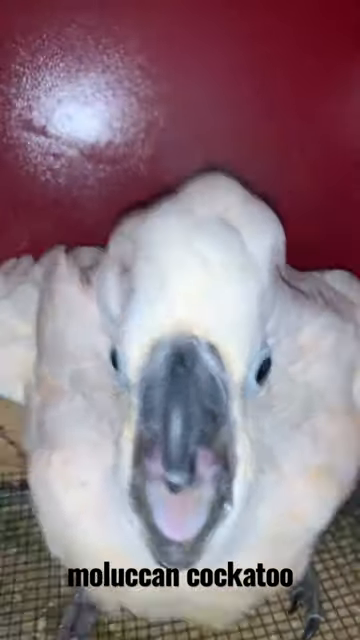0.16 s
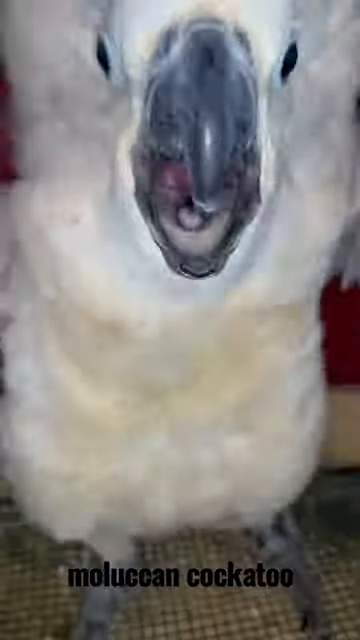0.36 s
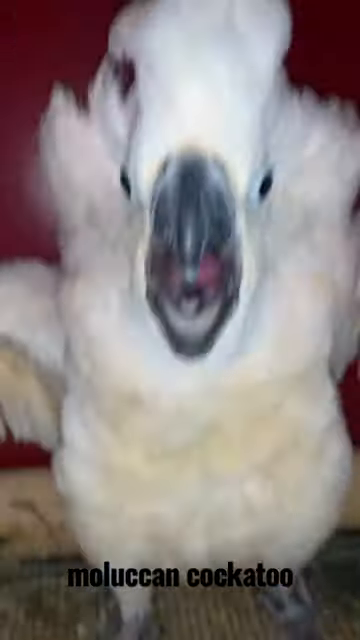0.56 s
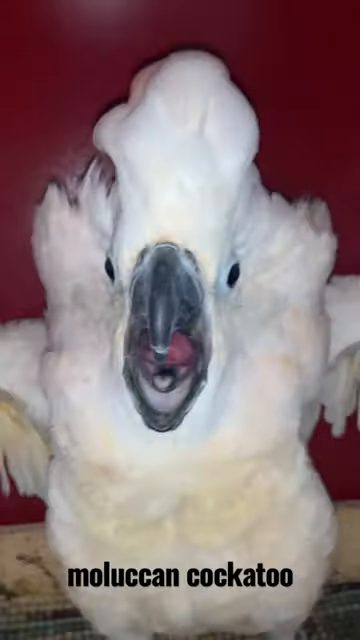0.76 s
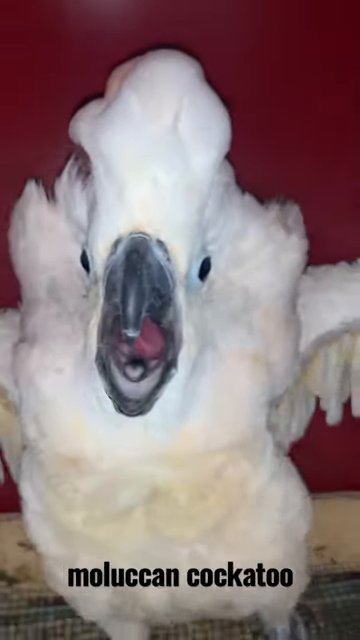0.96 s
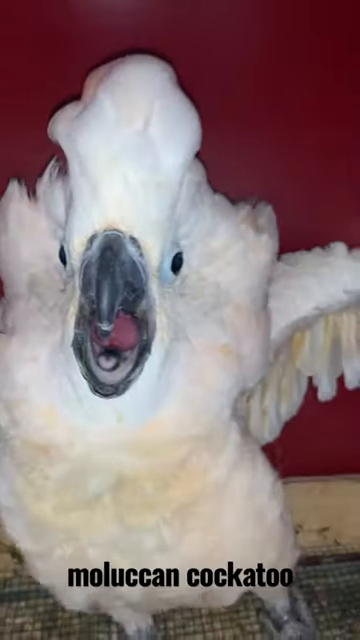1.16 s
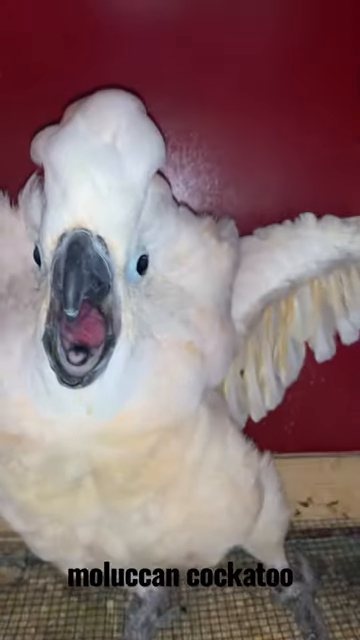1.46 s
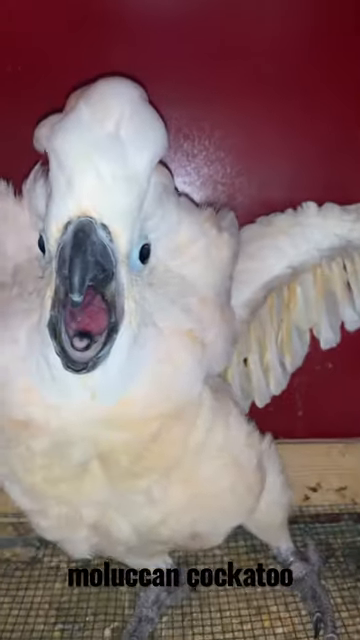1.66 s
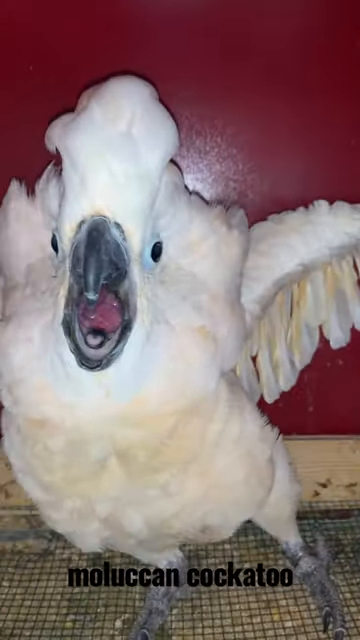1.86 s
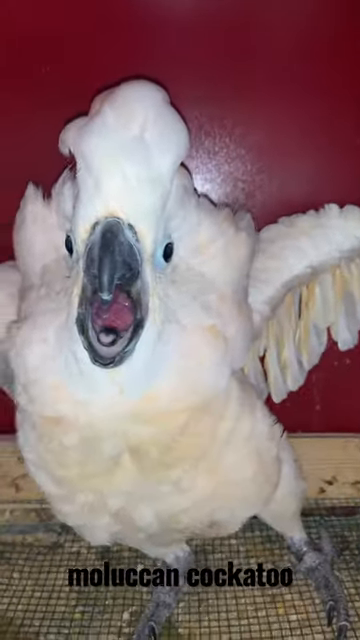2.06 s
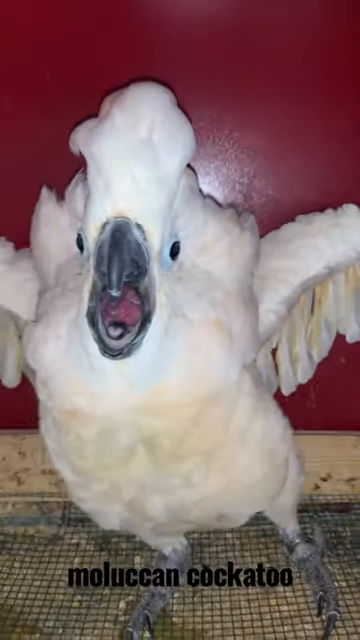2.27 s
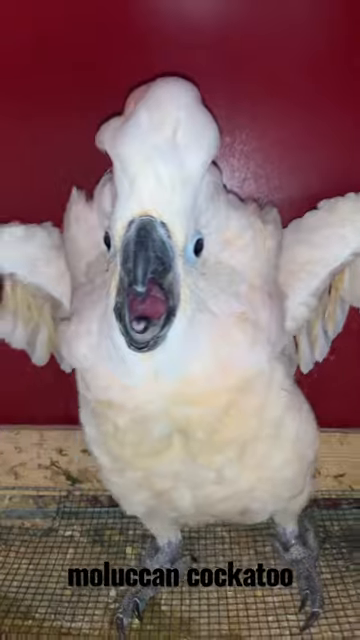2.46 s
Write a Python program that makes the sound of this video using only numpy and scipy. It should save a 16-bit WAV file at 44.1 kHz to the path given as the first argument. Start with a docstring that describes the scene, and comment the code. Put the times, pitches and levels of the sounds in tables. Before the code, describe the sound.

Harsh parrot screeches, very close and loud indoors: a faint squeak and soft wing flaps first, then a breaking raspy scream, a brief gap with feather rustle, a longer hoarse cry, and a third cut off.

```python
"""In a small indoor enclosure, close to a phone, a cockatoo screeches twice and starts a third call.
The voice sums clean harmonics and a rasp of uneven pulses shaped by throat and beak resonances:
the first call breaks in and out of the rasp, the second is hoarse throughout and flares into a shrill ring.
A faint sine squeak and coloured-noise rustle, wing flaps and hum lie around the calls.
Two microphone ports, near walls, a far room and a limiter shape the sound."""
import sys
import numpy as np
from scipy import signal
from scipy.fft import rfft, irfft, next_fast_len
from scipy.io import wavfile
from scipy.ndimage import uniform_filter1d, minimum_filter1d, map_coordinates

SR = 44100
rng = np.random.default_rng(int(sys.argv[2]) if len(sys.argv) > 2 else 0)


def master(y):
    """Save y as 16-bit WAV."""
    cut = np.clip(np.atleast_2d(y).T, -1, 1)
    pcm = np.round(cut * 32767)  # scale
    wavfile.write(sys.argv[1], SR, pcm.astype(np.int16))


N = 114660


def amp(db):
    """Decibels to gain."""
    return 10 ** (np.asarray(db) / 20)


def unit(x):
    """Scale to rms 1."""
    return x / np.sqrt(np.mean(x ** 2) + 1e-20)


def along(points, hz):
    """Read (Hz, value) points on a log frequency axis."""
    point_hz, value = np.transpose(points)
    return np.interp(np.log(hz + 1), np.log(point_hz + 1), value)


def clock():
    """Time of each sample, s."""
    return np.arange(N) / SR


def curve(rows, axis=1):
    """One column of a timed table, per sample."""
    rows = np.asarray(rows)
    return np.interp(clock(), rows[:, 0], rows[:, axis])


EDGE_S = 0.0016


def level(rows, axis=1):
    """Gain from a dB column, fading to silence over EDGE_S outside the table's span."""
    outside_s = np.maximum(rows[0][0] - clock(), clock() - rows[-1][0])
    return amp(curve(rows, axis=axis)) * np.clip(1 - outside_s / EDGE_S, 0, 1)


def wobble(rate_hz):
    """Smooth random curve, rate_hz knots a second."""
    return map_coordinates(rng.standard_normal(N // 8), [np.arange(N) * rate_hz / SR], mode="wrap")


def filtered(x, response):
    """Multiply the spectrum of x by a response of frequency."""
    size = next_fast_len(N + SR // 2)
    return irfft(rfft(x, size) * response(np.fft.rfftfreq(size, 1 / SR)), size)[..., :N]


def noise(colour):
    """Coloured noise of rms 1."""
    return unit(filtered(rng.standard_normal(N), lambda hz: amp(along(colour, hz))))


def cycles(pitch_hz, jitter, rate_hz):
    """Vibration cycles counted at an unsteady pitch; jitter is a share of pitch."""
    return np.cumsum(pitch_hz * (1 + jitter * wobble(rate_hz))) / SR


# hum spectrum: freq_hz, gain_db
HUM_COLOUR = [(15, -40.5), (25, 0.5), (122, 3.5), (182, -23.5), (264, -25), (448, -12.5), (616, -26),
              (1260, -58.5), (2080, -41), (14000, -50.5)]
HUM_DB = -75


def hum():
    """Steady room hum: noise weighted to the lowest frequencies."""
    return amp(HUM_DB) * noise(HUM_COLOUR)


# feather rustle: time_s, level_db
RUSTLE = [(.05, -74.5), (.11, -78.5), (.15, -71.5), (.2, -71.5), (.23, -55.5), (1.02, -68), (1.15, -76),
          (2.36, -63), (2.44, -66), (2.5, -66), (2.55, -66)]
# rustle spectrum: freq_hz, gain_db
RUSTLE_COLOUR = [(150, -26.5), (330, -2.5), (600, -15.5), (1500, -0.5), (3000, -1), (4800, -2.5),
                 (6500, -7), (9000, -13), (14000, -28)]


def rustle():
    """Feathers rubbing: broadband noise following a level curve."""
    return level(RUSTLE) * noise(RUSTLE_COLOUR)


# squeak: time_s, pitch_hz, level_db
SQUEAK = [(.075, 3700, -77), (.105, 3870, -74.5), (.125, 3950, -60), (.145, 4240, -84)]


def squeak():
    """Thin rising squeak: one sine with fast random pitch jitter."""
    count = cycles(curve(SQUEAK), jitter=0.029, rate_hz=600)
    return level(SQUEAK, axis=2) * unit(np.sin(2 * np.pi * count))


# wing flaps: centre_s, width_s (Gaussian sigma), level_db
FLAPS = [(.21, 0.066, -60.5), (.35, 0.086, -63.5), (2.42, 0.042, -69.5)]
# flap spectrum: freq_hz, gain_db
FLAP_COLOUR = [(25, -36.5), (60, -8.5), (85, -3), (130, -18.5), (300, -36), (1000, -42), (4000, -95)]


def wing_flaps():
    """Wings pushing air at the microphone: Gaussian swells of low noise."""
    gain = sum(amp(db) * np.exp(-((clock() - centre_s) / width_s) ** 2 / 2)
               for centre_s, width_s, db in FLAPS)
    return gain * noise(FLAP_COLOUR)


def tone(count, pitch_hz, colour, halves_db, shimmer_db):
    """Clean harmonics plus lines halfway between them, each with a wandering level."""
    out = np.zeros(N)
    for k in np.arange(2, 46) / 2:
        gain_db = along(colour, k * pitch_hz) + halves_db * (k % 1 > 0) + shimmer_db * wobble(45.064)
        out += amp(gain_db) * np.sin(2 * np.pi * (k * count + rng.random()))
    return unit(out)


SMEAR_HZ, SMEAR_TURN_RAD = 444, 1.64  # random phase ripple: spacing, depth


def throat(x, colour, beak):
    """Pulses ring in minimum-phase beak resonances; the closest walls spread them by phase ripple."""
    size = 4096
    f = np.fft.rfftfreq(size, 1 / SR)
    lift_db = sum(db / (1 + (2 * (f - hz) / width_hz) ** 2) for hz, width_hz, db in beak)
    # fold the cepstrum to get the minimum-phase impulse response
    cepstrum = irfft(np.log(amp(along(colour, f) + lift_db)))
    cepstrum[1:size // 2] *= 2
    cepstrum[size // 2 + 1:] = 0
    impulse = irfft(np.exp(rfft(cepstrum)))
    rung = signal.fftconvolve(x, impulse)[:N]
    ripple = rng.standard_normal(size)

    def smear(hz):
        return np.exp(1j * SMEAR_TURN_RAD * map_coordinates(ripple, [hz / SMEAR_HZ]))
    return unit(filtered(rung, smear))


def rasp(count, colour, beak, scatter_s, size_db, alternate_db, air_db, puff_s):
    """Uneven pulses, strong and weak in turn, each followed by a decaying puff of air noise."""
    beat = np.arange(1, int(count[-1]))
    chance = rng.standard_normal((N // 20, 2))[:len(beat)]
    at = np.interp(beat, count, np.arange(N)) + scatter_s * SR * chance[:, 0]
    at = np.clip(at, 8, N - 10)
    size = amp(size_db * np.tanh(chance[:, 1]) - alternate_db * (beat % 2))
    # windowed sinc places pulses between samples
    taps = at.astype(int)[:, None] + np.arange(-7, 9)
    offset = taps - at[:, None]
    shape = size[:, None] * np.sinc(offset) * np.sinc(offset / 9)
    pulses = np.bincount(taps.ravel(), shape.ravel(), N)
    gate = signal.lfilter([1], [1, -np.exp(-1 / (puff_s * SR))], pulses)
    air = unit(gate * rng.standard_normal(N))
    return throat(unit(pulses - pulses.mean()) + amp(air_db) * air, colour, beak)


# pitch: time_s, pitch_hz
PITCH_1 = [(.22, 422.9), (.245, 499.2), (.275, 561.6), (.31, 537), (.345, 552.5), (.38, 572.7),
           (.425, 559.8), (.49, 582.4), (.55, 591.2), (.6, 583.1), (.66, 598.7), (.76, 586.4), (.87, 576.3),
           (.96, 589), (1.0, 564)]
# clean tone: time_s, level_db
TONE_1 = [(.22, -40), (.27, -31), (.35, -27.5), (.46, -28), (.55, -26), (.6, -21), (.65, -23), (.72, -24),
          (.79, -29), (.83, -29), (.96, -25.5), (.995, -31.5)]
# rasp: time_s, level_db
RASP_1 = [(.221, -36), (.238, -33), (.265, -21.5), (.285, -21), (.3, -35.5), (.32, -21.5), (.345, -40),
          (.385, -14.5), (.41, -37), (.435, -18), (.455, -24), (.49, -14.5), (.535, -25), (.56, -21),
          (.58, -47), (.64, -40.5), (.683, -15.5), (.71, -31.5), (.76, -20.5), (.795, -14.5), (.81, -21),
          (.9, -22.5), (.99, -23.5), (1.005, -68.5)]
# whistling 7th harmonic: time_s, level_db
WHISTLE_1 = [(.48, -45.5), (.55, -34.5), (.59, -21.5), (.65, -31), (.72, -27.5), (.82, -25.5), (.88, -34),
             (.96, -21.5), (.985, -50)]
# added 2nd harmonic: time_s, level_db
LOW_LINE_1 = [(.228, -37), (.27, -39), (.35, -30.5), (.42, -35), (.52, -39.5), (.6, -50)]
# half-harmonic lines: time_s, level_db (re harmonics)
HALVES_1 = [(.3, -11), (.6, -10), (.72, -9), (.82, 0.5), (.96, 0.5)]
# tone spectrum: freq_hz, gain_db
TONE_COLOUR_1 = [(290, -52), (580, -33.5), (870, -14.5), (1150, -11), (1750, -1), (2330, -8), (2900, -7),
                 (3500, -7.5), (4100, -2.5), (4650, -13.5), (5250, -5), (5800, -17), (6400, -16.5),
                 (7000, -12.5), (7600, -19), (8700, -21.5), (10500, -40), (14000, -43.5)]
# rasp spectrum: freq_hz, gain_db
RASP_COLOUR_1 = [(200, -48.5), (450, -35), (700, -29), (950, -7.5), (1200, -5.5), (1600, -2), (2100, -3.5),
                 (2600, 0.5), (3200, -4.5), (4200, -7.5), (4900, -8), (6000, -7), (7500, -18.5),
                 (9000, -24.5), (10500, -28.5), (12000, -36.5), (14000, -29)]
# throat and beak resonances: freq_hz, width_hz, lift_db
BEAK_1 = [(1238, 91, 16.5), (1840, 160, 5), (2017, 140, 17), (2306, 30, 3.5), (2670, 79, 9),
          (2960, 53, 3.5), (3385, 170, 1), (3790, 86, 5.5), (4360, 90, 12.5), (5980, 190, 0.5)]


def first_call():
    """Clear note breaking into half-pitch rasp; weight moves from the 2nd to the whistling 7th harmonic."""
    pitch_hz, tone_gain, rasp_gain = curve(PITCH_1), level(TONE_1), level(RASP_1)
    roughness = rasp_gain / (rasp_gain + tone_gain + 1e-9)
    count = cycles(pitch_hz, jitter=0.0012 + 0.00491 * roughness, rate_hz=280)
    clean = tone(count, pitch_hz, TONE_COLOUR_1, curve(HALVES_1), shimmer_db=2)
    flicker = amp(4 * roughness * np.tanh(wobble(130)))
    whistle = unit(flicker * np.sin(2 * np.pi * count * 7))
    low_line = unit(np.sin(2 * np.pi * 2 * count))
    harsh = rasp(count, RASP_COLOUR_1, BEAK_1, scatter_s=.00003, size_db=5.5,
                 alternate_db=12, air_db=-5.5, puff_s=0.0018)
    voiced = tone_gain * clean + level(LOW_LINE_1) * low_line + level(WHISTLE_1) * whistle
    return voiced + rasp_gain * harsh


# tone spectrum: freq_hz, gain_db
TONE_COLOUR_2 = [(290, -51), (560, -39.5), (800, -29.5), (1060, -4), (1170, -2.5), (1630, -3.5), (1800, -7),
                 (2160, -0.5), (2350, 0.5), (2600, -12), (2950, 0.5), (3400, -3), (3900, -9.5), (4800, -4),
                 (6300, -12), (7500, -31), (11500, -40), (14000, -52)]
# rasp spectrum: freq_hz, gain_db
RASP_COLOUR_2 = [(200, -47.5), (450, -36), (750, -35), (950, -8.5), (1200, -9), (1700, -7), (2100, -0.5),
                 (2500, -13.5), (3100, -7), (3700, -12), (4800, -3), (6200, -13.5), (7200, -17.5),
                 (8000, -15.5), (8800, -32), (9800, -38.5), (11600, -18.5), (14000, -33.5)]
# throat and beak resonances: freq_hz, width_hz, lift_db
BEAK_2 = [(1125, 70, 12.5), (1278, 87, 9.3), (1503, 180, 9.8), (1710, 120, 2.8), (2018, 83, 7.4),
          (2081, 43, 10), (2460, 23, 2.2), (2674, 59, 6), (3160, 75, 2), (3200, 180, 9.2)]


def hoarse_call(pitch_hz, tone_gain, rasp_gain, low_gain):
    """Wavering tone, optional added 2nd harmonic, airy rasp; pitch steadies as the rasp recedes."""
    roughness = rasp_gain / (rasp_gain + tone_gain + 1e-9)
    count = cycles(pitch_hz, jitter=0.00507 + 0.00582 * roughness, rate_hz=190)
    clean = tone(count, pitch_hz, TONE_COLOUR_2, halves_db=-11.5, shimmer_db=3)
    low_line = unit(np.sin(2 * np.pi * 2 * count))
    harsh = rasp(count, RASP_COLOUR_2, BEAK_2, scatter_s=.00009, size_db=5,
                 alternate_db=-4, air_db=-3.5, puff_s=0.0012)
    return tone_gain * clean + low_gain * low_line + rasp_gain * harsh


# pitch: time_s, pitch_hz
PITCH_2 = [(1.22, 498.1), (1.3, 515), (1.4, 533.5), (1.55, 540.1), (1.68, 547.8), (1.75, 531.7),
           (1.87, 553.4), (1.96, 534.4), (2.06, 558.5), (2.2, 578.6), (2.31, 589.3), (2.345, 535)]
# effort: time_s, tone_db, rasp_db
EFFORT_2 = [(1.222, -73, -43.5), (1.26, -39.5, -33.5), (1.36, -34.5, -31.5), (1.55, -31, -32.5),
            (1.69, -35.5, -30.5), (1.76, -31, -31.5), (1.84, -33, -31), (1.97, -33.5, -31),
            (2.12, -31.5, -31), (2.28, -25, -32.5), (2.335, -28.5, -32), (2.35, -81, -52)]
# added 2nd harmonic: time_s, level_db
LOW_LINE_2 = [(1.24, -45), (1.36, -46), (1.55, -40.5), (1.75, -44), (1.9, -40.5), (2.08, -35), (2.2, -44)]


def second_call():
    """Long hoarse call with a firm 2nd harmonic."""
    return hoarse_call(curve(PITCH_2), level(EFFORT_2), level(EFFORT_2, axis=2), level(LOW_LINE_2))


# ring flares: start_s, length_s, level_db
FLARES = [(1.376, 0.026, -28), (1.437, 0.018, -26.5), (1.479, 0.021, -26.5), (1.6, 0.027, -30.5),
          (1.713, .028, -29), (1.755, 0.045, -26.5), (1.927, 0.019, -32), (1.96, 0.023, -26),
          (1.994, .012, -30.5), (2.321, 0.012, -30.5)]
RING_HZ, RING_WANDER_SHARE, RING_PAN_DB = 2107, 0.0185, -5  # pan: left minus right, before the ports


def flares():
    """Voice locks briefly onto one shrill resonance: a gated sine, unsteady in pitch and level."""
    t = clock()
    gain = 0
    for start_s, length_s, db in FLARES:
        inside_s = np.minimum(t - start_s, start_s + length_s - t)
        gain = gain + amp(db) * np.clip(inside_s / 0.011 + .5, 0, 1)
    count = cycles(RING_HZ, jitter=RING_WANDER_SHARE, rate_hz=250)
    ring = unit(np.sin(2 * np.pi * count) * amp(0.67 * wobble(200)))
    return gain * ring * amp(np.array([[RING_PAN_DB], [-RING_PAN_DB]]) / 2)


# third call: time_s, pitch_hz, tone_db, rasp_db
CALL_3 = [(2.569, 483.5, -66, -45), (2.585, 488, -62.5, -48), (2.6, 526.5, -39.5, -35.5)]


def third_call():
    """Opening of another hoarse call, without the added 2nd harmonic."""
    return hoarse_call(curve(CALL_3), level(CALL_3, axis=2), level(CALL_3, axis=3), low_gain=0)


# low enclosure resonances: freq_hz, width_hz, gain_db
CAGE_MODES = [(183.2, 30, 12), (334.5, 30.3, 12.5), (591.4, 35, 13)]


def cage(x):
    """Enclosure booms at its low resonances: band-pass modes added to the direct sound."""
    def response(f):
        return 1 + sum(amp(db) * 1j * f * width_hz / (hz * hz - f * f + 1j * f * width_hz)
                       for hz, width_hz, db in CAGE_MODES)
    return filtered(x, response)


# port phase: freq_hz, left_lead_rad
PORT_PHASE = [(100, -5.5), (450, 3.84), (600, -1.4), (1000, 4), (1400, 1.08), (2200, 1.5853), (3200, 2),
              (4100, 0.91), (4850, 3.5), (5500, 3.5), (6100, 5.5), (7300, 7.5), (9200, 1), (10100, -6.5),
              (12300, 19.5), (14000, 16.5)]
# port balance: freq_hz, left_minus_right_db
PORT_BALANCE = [(500, -3.5), (800, 6.5), (1050, -6), (1500, 0), (2100, -4.5), (2900, 0.5), (4100, -1),
                (7000, -0.5)]


def ports(x):
    """Bird reaches the two microphone ports with different phase and level per frequency."""
    sides = np.array([[1], [-1]]) / 2

    def response(hz):
        return amp(sides * along(PORT_BALANCE, hz)) * np.exp(1j * sides * along(PORT_PHASE, hz))
    return filtered(x, response)


def echo(x, t60):
    """Diffuse reflections after 2 ms: a noise tail, each frequency dying at its own speed."""
    hz, t, z = signal.stft(rng.standard_normal((2, SR // 2)), SR, nperseg=256)
    decay = amp(-60 * t / along(t60, hz)[:, None])
    tail = signal.istft(z * decay, SR, nperseg=256)[1]
    delayed = np.pad(tail, ((0, 0), (SR // 500, 0))) / np.linalg.norm(tail[0])
    return signal.fftconvolve(x, delayed, axes=1)[:, :N]


# near-wall decay: freq_hz, t60_s
NEAR_T60 = [(200, 0.027), (2000, 0.11), (12000, 0.02)]
# far-room decay: freq_hz, t60_s
ROOM_T60 = [(200, 1), (1500, 0.69), (5000, 0.24), (12000, 0.49)]
NEAR_DB, ROOM_DB = -7, -31


def scene():
    """Bird through enclosure and ports, with near walls and far room; hum and flaps alike at both ports."""
    hoarse = second_call() + third_call()
    calls = first_call() + hoarse
    small_sounds = squeak() + rustle()
    bird = ports(cage(calls + small_sounds) + flares())
    near = amp(NEAR_DB) * echo(bird, NEAR_T60)
    room = amp(ROOM_DB) * echo(bird, ROOM_T60)
    low_air = wing_flaps() + hum()
    return bird + near + room + low_air


LIMIT_DB, LIMIT_S, TOP_HZ = -9, 0.002, 14400  # limiter ceiling, reaction time; band limit


def record(dry):
    """Phone limits the peaks with one gain for both channels and keeps nothing from TOP_HZ up."""
    size = max(int(LIMIT_S * SR), 1)
    needed = np.minimum(1, amp(LIMIT_DB) / (np.abs(dry).max(axis=0) + 1e-9))
    gain = uniform_filter1d(minimum_filter1d(needed, 2 * size), size)
    return filtered(dry * gain, lambda hz: hz < TOP_HZ)


dry = scene()
out = record(dry)
master(out)
```